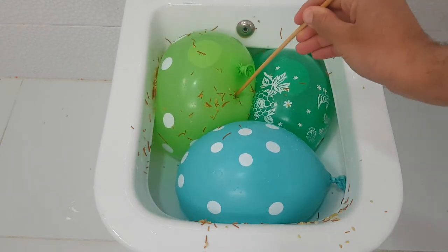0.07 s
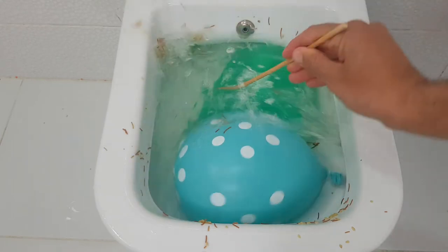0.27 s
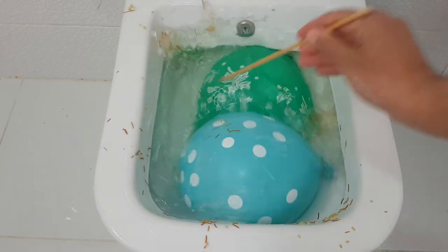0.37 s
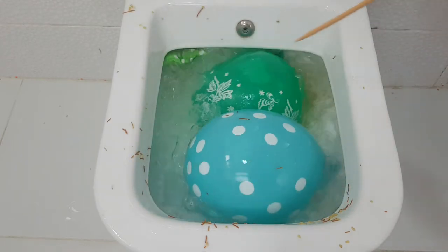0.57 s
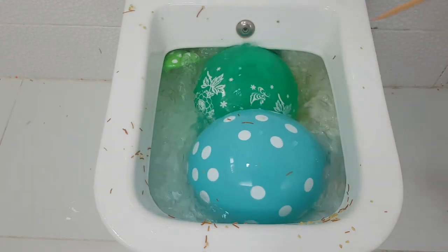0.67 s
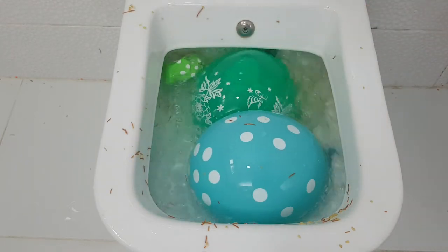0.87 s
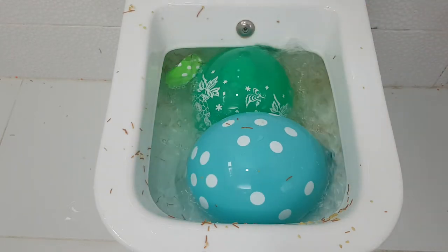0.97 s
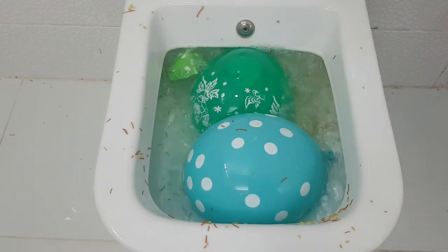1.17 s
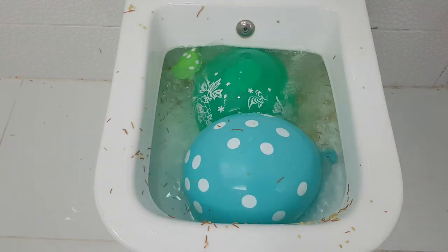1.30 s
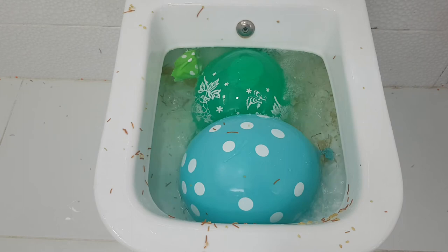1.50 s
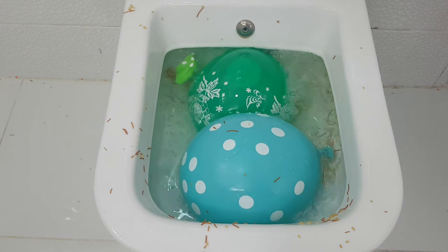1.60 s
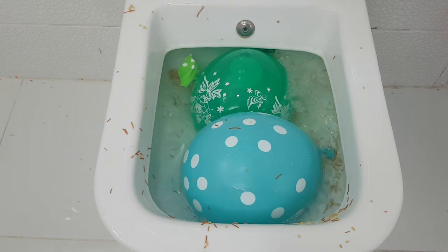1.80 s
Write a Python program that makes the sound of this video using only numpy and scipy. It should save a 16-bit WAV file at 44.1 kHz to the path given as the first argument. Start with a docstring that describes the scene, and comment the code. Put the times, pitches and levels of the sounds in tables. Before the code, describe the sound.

A water balloon bursts with a hard snap, its water dropping and churning in a ceramic basin, then sloshing back with a fat plop and a few drips, heard close in a small echoing tiled bathroom.

```python
"""A water balloon is pricked over a part-filled ceramic basin in a small tiled bathroom.
A faint rustle of noise over a quiet hush leads to the prick: the skin snaps, cracks and rips (noise bursts).
The water drops in with a gulp of trapped air, splashes and sprays (chirping sines, each a bubble); drops
tick (short noise and a ring) and soft puffs thump. It sloshes back with one fat plop, more drops tick and
a last bubble rises, while the room rings (a decaying noise tail and standing waves)."""
import sys
import numpy as np
from scipy import signal
from scipy.fft import rfft, irfft
from scipy.io import wavfile

SR = 44100
rng = np.random.default_rng(int(sys.argv[2]) if len(sys.argv) > 2 else 0)


def file_out(sig):
    """Save sig as 16-bit WAV at sys.argv[1]."""
    # one column per channel
    cols = np.atleast_2d(sig).T
    # limit, then scale
    lim = np.clip(cols, -1, 1)
    pcm = np.round(lim * 32767).astype(np.int16)
    wavfile.write(sys.argv[1], SR, pcm)


N = 81585  # length in samples

PRICK_S = 0.2158
# loudness of the falling and sloshing water: time_s, level_db
SPLASH_LEVEL = [(0.222, -34), (0.27, -26.5), (0.36, -28.5), (0.53, -29.5), (0.61, -29), (0.68, -35.5),
                (0.8, -44), (0.9, -51), (0.96, -41.5), (1.03, -49), (1.16, -48.5), (1.27, -64), (1.5, -88),
                (1.85, -73)]


def amp(db):
    """Decibels are logarithmic: 20 dB is a factor of ten in pressure."""
    return 10 ** (np.asarray(db) / 20)


def curve(points):
    """Envelope linear in decibels between (time_s, level_db) points; silent before the first."""
    t = np.arange(N) / SR
    times, db = np.array(points).T
    return amp(np.interp(t, times, db)) * (t >= times[0])


def over_hz(points, hz):
    """Interpolate (frequency_hz, value) points by musical interval, on a log-frequency axis."""
    f, v = np.array(points).T
    return np.interp(np.log(np.maximum(hz, 1)), np.log(f), v)


def unit(x):
    """Normalise the mean power: scale to rms 1."""
    return x / np.sqrt(np.mean(x ** 2))


def pan(x, db):
    """Place a sound by its level difference, left minus right in dB."""
    return x * amp(np.array([[db], [-db]]) / 2)


def colour(x, points, size=4096):
    """Minimum-phase filter: folding the cepstrum makes a (frequency_hz, level_db) response causal."""
    hz = np.linspace(0, SR / 2, size // 2 + 1)
    cepstrum = irfft(np.log(amp(over_hz(points, hz))))
    cepstrum[1:size // 2] *= 2
    cepstrum[size // 2 + 1:] = 0
    impulse = irfft(np.exp(rfft(cepstrum)))
    return signal.fftconvolve(np.atleast_2d(x), impulse[None])[:, :N]


def add(track, at, sound):
    """Superposition: sum a sound into a track at a time in seconds."""
    i = int(np.clip(at * SR, 0, N - 1))
    track[i:i + len(sound)] += sound[:N - i]


def ring(hz, cycles, count=7):
    """Damped bubble resonance: a sine that swells quickly, dies away and rises a little in pitch."""
    glide, onset_cycles = 0.034, 0.44  # fractional rise in pitch per decay time; swelling time
    turn = np.arange(int(count * cycles * SR / hz) + 2) * hz / SR
    age = turn / cycles  # in decay times
    swell = 1 - np.exp(-turn / onset_cycles)
    return np.sin(2 * np.pi * turn * (1 + glide * age / 2)) * np.exp(-age) * swell


def grains(per_s, cycles, spread_db, low_hz, high_hz):
    """Random superposition: a steady crowd of tiny bubbles of all sizes, a few much louder."""
    out = np.zeros(N)
    draws = np.random.default_rng(rng.integers(2 ** 31)).random((int(per_s * N / SR), 4))
    for when, size, strength, damping in draws:
        hz = low_hz * (min(high_hz, SR / 2) / low_hz) ** size
        loud = min(-np.log(1 - strength), np.pi)  # exponential spread, capped
        level = amp(spread_db * loud) * np.sqrt(hz)
        add(out, when * N / SR, level * ring(hz, cycles * (.5 + damping)))
    return out


def noise(spectrum):
    """Incoherent field: coloured noise, unrelated left and right."""
    return unit(colour(rng.standard_normal((2, N)), spectrum))


def burst(at, rise_s, decay_s, db, spectrum, pan_db, room_db):
    """Sudden release of tension: noise rises linearly, then decays exponentially.

    Like each source that excites the room, it gives (direct sound, feed to the room)."""
    age = np.maximum(np.arange(N) / SR - at, 0)
    envelope = np.minimum(age / rise_s, 1) * np.exp(-np.maximum(age - rise_s, 0) / decay_s)
    x = amp(db) * envelope * unit(colour(rng.standard_normal(N), spectrum))
    return pan(x, pan_db), amp(room_db) * x


def hush():
    """Stationary background: steady coloured noise, slightly stronger on the right."""
    # relative spectrum of the background: frequency_hz, level_db
    hush_colour = [(30, -5.5), (150, -3), (700, -13.5), (2000, -16.5), (6000, -20.5), (9500, -30),
                   (13000, -24.5)]
    return pan(amp(-66) * noise(hush_colour), -3)


def rustle():
    """Amplitude-modulated noise: a faint rustle that swells up to the prick and then fades."""
    # loudness of the rustle: time_s, level_db
    rustle_level = [(0, -64.5), (0.125, -61), (0.21, -58), (0.3, -80)]
    # relative spectrum of the rustle: frequency_hz, level_db
    rustle_colour = [(80, -20.5), (280, 2.5), (900, -10.5), (2600, -10), (7000, -40)]
    return curve(rustle_level) * noise(rustle_colour)


def snap():
    """Pressure impulse: the first split of the taut skin is one hard, very short swing."""
    x = np.zeros(N)
    add(x, PRICK_S, amp(-5.5) * ring(hz=1800, cycles=0.6))
    return x, amp(-8) * x


def crack():
    """Broadband rupture: the skin cracks in an abrupt burst of noise."""
    # relative spectrum of the crack: frequency_hz, level_db
    crack_colour = [(30, -10), (130, -9), (300, -6), (800, 4.5), (1700, 1.5), (3500, 4.5), (7000, -4),
                    (15000, -9.5)]
    return burst(PRICK_S, rise_s=0.0002, decay_s=0.016, db=-15.5,
                 spectrum=crack_colour, pan_db=-1, room_db=6)


def bathroom():
    """Reverberation: a dense tail, alike at both ports in the bass, and standing waves."""
    # reverberation time of the tiled room, to fall by 60 dB: frequency_hz, t60_s
    room_t60 = [(100, 0.3), (400, 0.72), (1000, 0.81), (2500, 0.73), (5000, 0.84), (9000, 0.62),
                (15000, 0.45)]
    # standing waves of the room: frequency_hz, t60_s, relative_level_db
    room_modes = [(151.8, 0.54, -6), (231, 0.88, -9), (433.7, 0.41, -12), (483.6, 0.36, -16),
                  (649.2, 0.3, -13), (722, 0.27, -8.5), (905, 0.19, -20.5)]
    build_s, wide_hz, modes_db = 0.002, 610, -12.5  # modes_db shifts all standing waves
    t, hz = np.arange(N) / SR, np.linspace(0, SR / 2, N // 2 + 1)
    mid, side = rfft(rng.standard_normal((2, N)))
    apart = np.minimum(hz / wide_hz, 1)  # the ports differ more as wavelength shrinks
    field = (mid + np.array([[1], [-1]]) * apart * side) / np.sqrt(1 + apart ** 2)
    tail = 0
    for centre, t60 in room_t60:
        band = over_hz([(f, f == centre) for f, _ in room_t60], hz)  # overlapping triangles
        fade = amp(-60 * t / t60) * (1 - np.exp(-t / build_s))
        tail = tail + irfft(field * band, N) * fade / np.linalg.norm(fade)
    for f, t60, db in room_modes:
        wave = np.sin(2 * np.pi * (f * t + rng.random())) * np.exp(-np.log(1000) * t / t60)
        tail = tail + amp(db + modes_db) * wave / np.linalg.norm(wave)
    return tail


def rip():
    """Fast tearing of a thin sheet: a brief, bright burst of noise as the rubber rips."""
    # relative spectrum of the rip: frequency_hz, level_db
    rip_colour = [(500, -28.5), (3500, -8.5), (9000, 1.5), (11500, 8.5), (14000, 11), (16000, -3)]
    return burst(at=0.2188, rise_s=0.0014, decay_s=0.0033, db=-15,
                 spectrum=rip_colour, pan_db=8, room_db=-3)


def splash():
    """Bubble entrainment: the mass of water churns in the basin as a dense crowd of bubbles."""
    # relative spectrum of the churning water: frequency_hz, level_db
    splash_colour = [(40, -25.5), (90, -13), (190, -18), (270, -1), (450, 4), (1200, 9), (2400, 4.5),
                     (4000, -8), (8000, -13), (16000, -39)]
    crowd = grains(per_s=2000, cycles=5.14, spread_db=1.5, low_hz=78.9, high_hz=7844)
    x = curve(SPLASH_LEVEL) * unit(colour(crowd, splash_colour))
    return x, amp(0.5) * x


def gurgle():
    """Lightly damped resonance: fewer, longer-ringing bubbles chirp upward out of the churning water."""
    crowd = grains(per_s=160, cycles=13, spread_db=2, low_hz=452.8, high_hz=2575)
    x = amp(-4.5) * curve(SPLASH_LEVEL) * unit(crowd)
    return x, amp(-2) * x


def spray():
    """Many small impacts: thrown-up droplets patter back down as short, high grains."""
    # loudness of the fine spray landing: time_s, level_db
    spray_level = [(0.222, -35.5), (0.33, -35.5), (0.5, -46), (0.58, -37), (0.66, -45.5), (0.76, -55.5),
                   (0.92, -49), (1.01, -46), (1.1, -62.5), (1.23, -58), (1.32, -76), (1.5, -79)]
    # relative spectrum of the spray: frequency_hz, level_db
    spray_colour = [(100, -26), (1500, 8), (3000, 4.5), (5500, -4.5), (8000, -8), (16000, -6)]
    crowd = grains(per_s=3400, cycles=2.05, spread_db=6, low_hz=2073, high_hz=13900)
    x = curve(spray_level) * unit(colour(crowd, spray_colour))
    return x, amp(2.5) * x


def bubbles():
    """Volume pulsation: air pockets gulp and plop, the basin thuds; little radiates below their pitch."""
    # air pockets closing under water and low thuds of the basin:
    # start_s, pitch_hz, level_db, decay_cycles, room_db (room feed relative to direct)
    pockets = [(0.2705, 1380, -9.5, 4.4, -34), (0.286, 744, -4.5, 0.56, 14.5),
               (0.2995, 642, -5.5, 2.4, -2.5), (0.311, 616, -13, 11.2, -3.5), (0.32, 150.3, -33, 5, -13.5),
               (0.322, 480.3, -14.5, 12.3, 0.5), (0.3355, 475.5, -16, 7.9, -5.5),
               (0.34, 231, -25, 3.4, -13), (0.486, 250.1, -31.5, 11.5, 0), (0.487, 460, -19, 2.4, -4),
               (0.52, 1665, -25.5, 25, 2.5), (0.555, 3424, -17.5, 6.5, 4), (0.581, 1126, -15.5, 3.5, -1),
               (0.628, 1132, -20, 8, 1), (0.652, 737, -23, 2.4, -2.5), (0.8851, 2034, -20.5, 2.8, -1),
               (0.9283, 1083, 5, 0.43, 3), (0.937, 146.5, -36, 15, -21), (0.943, 473.6, -23, 5, 3.5),
               (0.957, 845, -14.5, 1.56, 9), (1.131, 1890, -26, 2.3, 1), (1.792, 1656, -48.5, 4, 2),
               (1.808, 1586, -56, 43, -8)]
    direct, feed = np.zeros((2, N))
    for at, hz, db, cycles, room_db in pockets:
        high_pass = signal.butter(2, hz / 2, "high", fs=SR, output="sos")
        x = amp(db) * signal.sosfilt(high_pass, ring(hz, cycles))
        add(direct, at, x)
        add(feed, at, amp(room_db) * x)
    return direct, feed


def drops():
    """Impact and resonance: each drop snaps on the surface, in a band around its pitch, and rings."""
    # single drops slapping the surface: start_s, level_db, pitch_hz, decay_s (of the snap; the ring takes half)
    slaps = [(0.555, -27, 13300, 0.0024), (0.828, -34, 7500, 0.0018), (0.9705, -38.5, 13500, 0.0023),
             (1, -31, 5230, 0.0042), (1.149, -28.5, 9760, 0.0016), (1.1505, -28, 4870, 0.0038)]
    skirt_db = -20.5  # fall of the snap's spectrum an octave from the drop's pitch
    x, t = np.zeros(N), np.arange(SR // 25) / SR
    for at, db, hz, decay_s in slaps:
        band = [(hz / 4, 2 * skirt_db), (hz / 2, skirt_db), (hz, 0), (2 * hz, skirt_db)]
        impact = np.exp(-t / decay_s) * rng.standard_normal(len(t))
        add(x, at, amp(db - 11) * ring(hz, decay_s * hz / 2))
        add(x, at, amp(db) * colour(impact, band)[0])
    return x, amp(5) * x


def puffs():
    """Heavily damped oscillation: puffs of air thump softly on the microphone, mostly its right port."""
    # puffs of air: start_s, pitch_hz, level_db
    thumps = [(0.684, 65.7, -37), (0.729, 54, -48.5), (0.827, 69.4, -53.5)]
    x = np.zeros(N)
    for at, hz, db in thumps:
        add(x, at, amp(db) * ring(hz, cycles=0.61))
    return pan(x, -35)


def microphone(air):
    """Frequency-dependent sensitivity: the two ports differ in balance and share a colour."""
    # response common to both ports: frequency_hz, level_db
    mic_colour = [(5000, 0), (7500, 2), (8700, -4), (10000, -3.5), (12800, 1), (15500, -5)]
    # level difference between the ports: frequency_hz, left_minus_right_db
    mic_balance = [(300, -7.5), (1000, -6), (2800, -3.5), (6000, -1), (11000, 2)]
    ports = []
    for x, sign in zip(air, (1, -1)):
        ports.append(colour(x, [(hz, sign * db / 2) for hz, db in mic_balance]))
    return colour(np.vstack(ports), mic_colour)


def scene():
    """Linear superposition: sources, direct and convolved with the room, meet at the two ports."""
    room = bathroom()
    sources = snap(), crack(), rip(), splash(), gurgle(), spray(), bubbles(), drops()
    direct, feed = (sum(part) for part in zip(*sources))
    echo = signal.fftconvolve(feed, room)[:, :N]
    air = direct + echo + rustle()
    return microphone(air) + puffs() + hush()


def record(dry):
    """Band limiting: a steep elliptic low-pass at 15.7 kHz cuts the top."""
    low_pass = signal.ellip(10, .2, 80, 15700, fs=SR, output="sos")
    return signal.sosfilt(low_pass, dry)


dry = scene()
out = record(dry)
file_out(out)
```